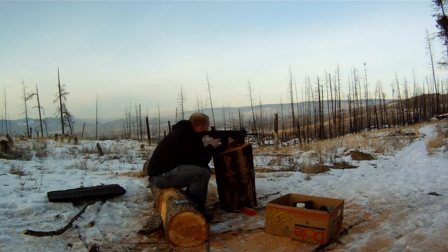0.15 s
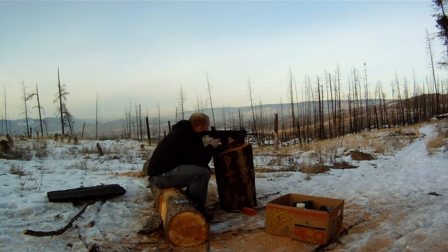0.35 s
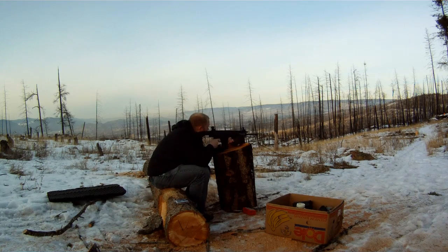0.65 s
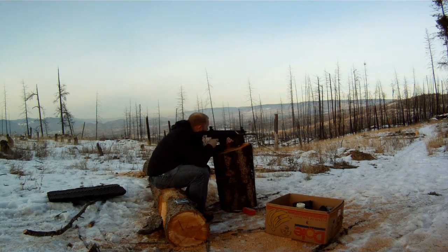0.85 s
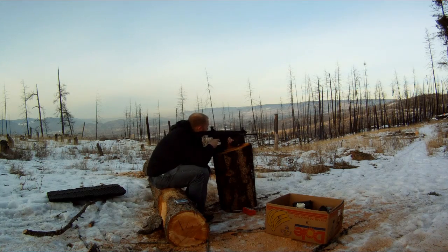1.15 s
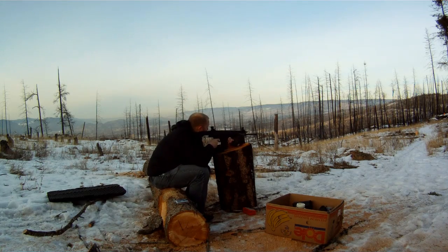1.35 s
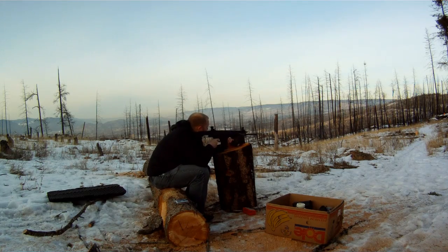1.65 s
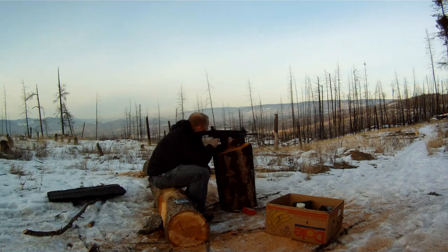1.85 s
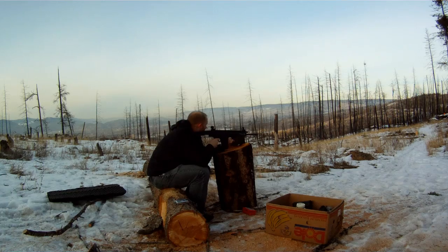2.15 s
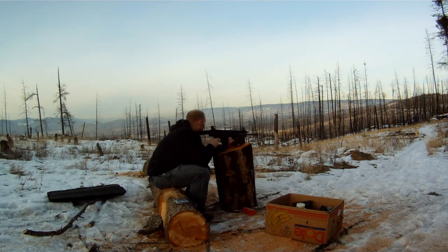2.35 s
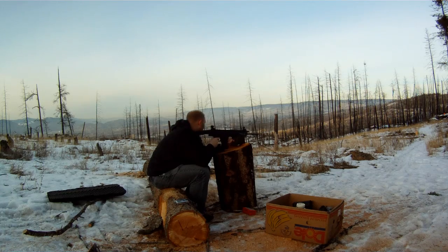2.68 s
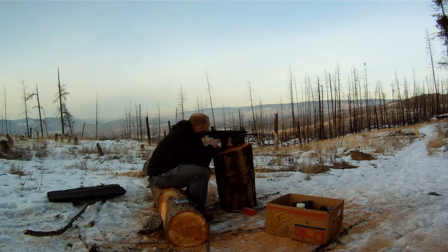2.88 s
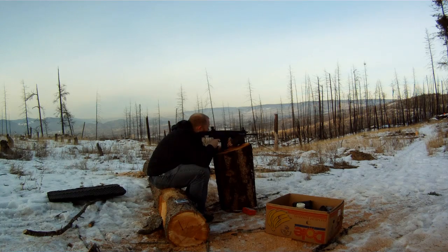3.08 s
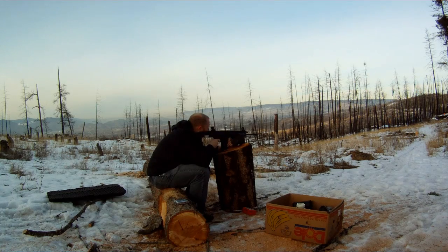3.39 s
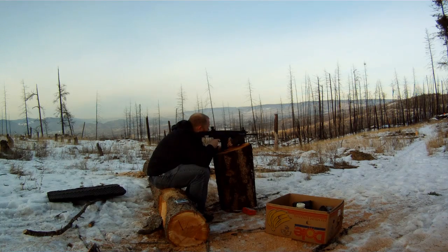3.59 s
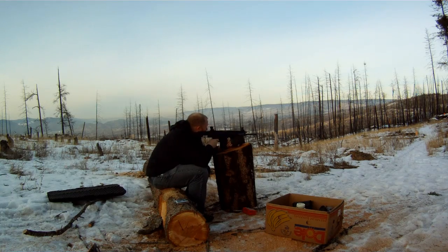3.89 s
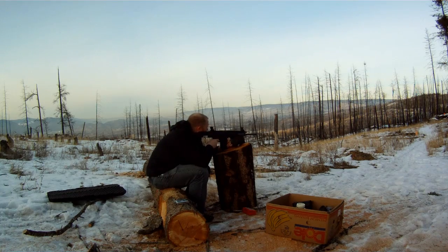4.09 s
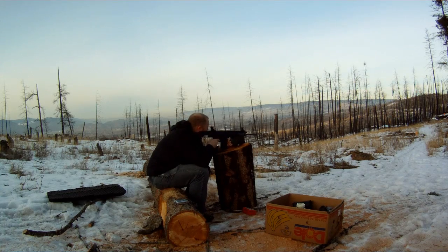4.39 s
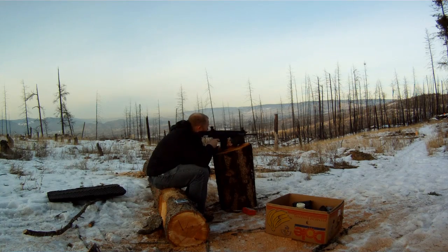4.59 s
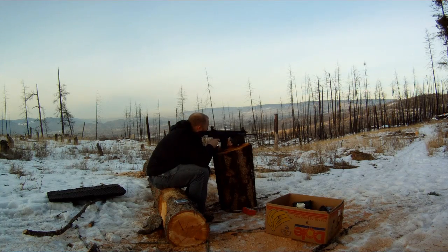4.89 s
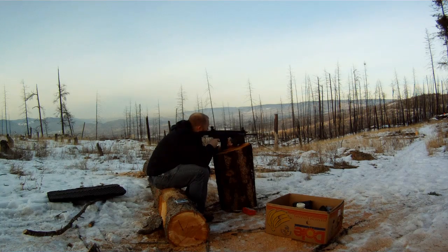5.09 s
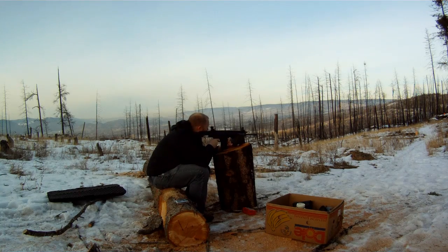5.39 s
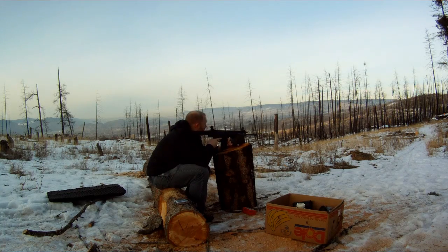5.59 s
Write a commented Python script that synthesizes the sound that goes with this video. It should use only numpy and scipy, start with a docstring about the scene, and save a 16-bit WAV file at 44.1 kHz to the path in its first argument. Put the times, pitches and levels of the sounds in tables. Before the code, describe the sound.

A wide, snowy hillside, heard through a nearby low-quality microphone with gritty treble. A low engine-like hum opens briefly stronger and slightly higher, then drops abruptly at 0.1 s to a fainter drone under soft air rumble and hiss. At about 0.95 s a rifle fires: a very short, harsh, clipped crack with a moment of suction and crackle. Echoes build immediately, slapping back from burnt trunks and slopes, strongest around 0.4 to 0.6 s after the shot, then rolling away ever duller, while a low rumble sinks in pitch. A small metal click sounds at 1.34 s. The tail fades into the hum, which shifts slightly higher at 2.8 s, with barely audible ticks. At 3.85 s a second, similar shot cracks, with the same long echo; a clearer metallic click follows at 4.35 s. The echo decays toward the quiet hum by the end, about 5.6 s.

```python
"""Two rifle shots on a snowy hillside: each is a burst of gas noise with a shock front, then suction,
that overloads a nearby microphone for a few milliseconds. The same long echo, filtered noise and slaps,
rolls back from burnt trunks and far slopes, ever duller, while a low wave sinks in pitch along the snow.
Damped modes give small metal clicks; harmonics and filtered noise make a distant engine hum over faint
air and hiss. Coarse sampling and holding adds a gritty mirror image in the treble."""
import sys
import numpy as np
from scipy import signal
from scipy.fft import rfft, irfft
from scipy.io import wavfile
from scipy.ndimage import uniform_filter1d

SR = 44100
rng = np.random.default_rng(int(sys.argv[2]) if len(sys.argv) > 2 else 0)


def generate_wav(sig):
    """Save sig (samples, or channels by samples) to the path in sys.argv[1] as 16-bit PCM at SR."""
    pcm = np.round(np.clip(np.atleast_2d(sig).T, -1, 1) * 32767).astype(np.int16)
    wavfile.write(sys.argv[1], SR, pcm)


N = 253134
ECHO_LENGTH = int(1.9 * SR)
TIME = np.arange(N) / SR
DELAY = TIME[:ECHO_LENGTH]   # seconds since a shot


def from_db(db):
    """Level to amplitude: 20 dB is a factor of ten."""
    return 10 ** (np.asarray(db) / 20)


def rms_one(x):
    """Normalization of power: scale to an rms of 1."""
    return x / np.sqrt(np.mean(x ** 2) + 1e-20)


def at_hz(points, hz):
    """Spectral interpolation: levels vary linearly along a log-frequency axis."""
    points = np.array(points)
    return np.interp(np.log(hz + 1), np.log(points[:, 0]), points[:, 1])


def butter(x, hz, kind, order=2):
    """Causal filtering with a maximally flat (Butterworth) passband."""
    sos = signal.butter(order, hz, kind, fs=SR, output="sos")
    return signal.sosfilt(sos, x + 1e-18)


def add(out, s, sound):
    """Superposition: mix a sound in, in place, at s seconds."""
    start = max(round(s * SR), 0)
    room = out[start:start + len(sound)]
    room += sound[:len(room)]


def drift(rate, size):
    """Slow random modulation: straight lines between unit-spread random knots, rate knots a second."""
    knots = rng.standard_normal(4096)
    return np.interp(np.arange(size) / SR * rate, np.arange(len(knots)), knots)


def causal(gain):
    """Minimum phase by folding the cepstrum: nothing sounds before its cause."""
    cepstrum = irfft(np.log(gain))
    half = len(cepstrum) // 2
    folded = np.r_[cepstrum[0], 2 * cepstrum[1:half], np.zeros(half)]
    return np.exp(rfft(folded))


# relative spectrum of still air and microphone hiss: pitch_hz [Hz], level_db [dB per Hz]
AIR_SPECTRUM = [(25, -4.5), (45, -1), (90, -2.5), (160, -10.5), (220, -17.5), (350, -19), (600, -21),
                (1000, -27), (2000, -30.5), (4500, -34), (5600, -37), (7000, -57)]


def air(level_db=-55):
    """Spectral shaping of white noise: a faint rumble under an even hiss."""
    hz = np.fft.rfftfreq(N, 1 / SR)
    white = rfft(rng.standard_normal(N))
    shaped = irfft(white * from_db(at_hz(AIR_SPECTRUM, hz)), N)
    return from_db(level_db) * rms_one(shaped)


# stretches of engine hum, joined abruptly: start_s [s], firing_rate_hz [Hz], first_harmonic_db [dB],
# second_harmonic_db [dB], exhaust_rasp_db [dB]; levels are before the random drift
ENGINE_STRETCHES = [(0, 69.5, -36, -54.5, -50.5), (.118, 64.35, -51.5, -64.5, -55),
                    (.95, 64.36, -57, -73, -58), (2.82, 72.6, -61.5, -57, -68.5),
                    (3.86, 75.4, -52, -62.5, -71)]


def engine(pipe_hz=385, pipe_width=0.45, waver=.005, throb=.6):
    """Periodic excitation of a resonance: two low harmonics, with firing pulses and gas in the exhaust."""
    starts, *columns = np.transpose(ENGINE_STRETCHES)
    row = np.maximum(np.searchsorted(starts, TIME, "right") - 1, 0)
    # a few milliseconds of smoothing softens each join
    hz, first_db, second_db, rasp_db = [uniform_filter1d(c[row], size=128) for c in columns]
    phase = 2 * np.pi * np.cumsum(hz * (1 + waver * drift(5, N))) / SR
    first = from_db(first_db) * np.sin(phase)
    second = from_db(second_db) * np.sin(2 * phase)
    hum = np.sqrt(2) * (first + second)

    # on the long way through the air each harmonic of the rasp fades and drifts on its own
    pulses = np.zeros(N)
    for k in range(3, 12):
        resonance = np.exp(-(np.log(k * hz / pipe_hz) / pipe_width) ** 2)
        fading = from_db(2.4 * drift(5, N))
        pulses += resonance * fading * np.cos(k * phase + 1.1 * drift(3.1, N))

    gas = butter(rng.standard_normal(N), [290, 560], "band")
    puffs = gas * (1 + throb * np.cos(phase))
    rasp = rms_one(rms_one(pulses) + .75 * rms_one(puffs))
    return hum * from_db(1.2 * drift(7.7, N)) + from_db(rasp_db) * rasp


# clicks of spent cases and of the rifle being handled: start_s [s],
# level_db [dB, of the contact noise before its filter and decay]
CLICKS = [(0.9400, -29), (1.3440, -22), (2.7650, -53), (2.7800, -58), (3.8504, -28), (4.3530, -14),
          (5.5700, -56)]
# modes of the metal: pitch_hz [Hz], relative level_db [dB], t60_s [s, time to decay by 60 dB]
METAL_MODES = [(2500, 0, .008), (3300, -4, .007), (4450, 0, .007), (5300, -1, .006)]


def metal_clicks():
    """Modal synthesis: a sharp snap of contact sets the damped modes of the metal ringing."""
    out, t = np.zeros(N), TIME[:SR // 20]
    modes = sum(from_db(db - 60 * t / t60) * np.sin(2 * np.pi * hz * t) for hz, db, t60 in METAL_MODES)
    modes = modes / np.linalg.norm(modes)
    snap = np.exp(-t / .003)
    for s, db in CLICKS:
        contact = butter(rng.standard_normal(len(t)), 2000, "high") * snap
        ring = signal.fftconvolve(contact, modes)[:len(t)]
        add(out, s, from_db(db) * (contact + .5 * ring))
    return out


def envelope(delay, rise, hold, fade_db_per_s):
    """Energy build-up and exponential decay: gain rises, holds and dies away after the delay."""
    since = DELAY - delay
    fade = from_db(-fade_db_per_s * np.maximum(since - rise - hold, 0))
    return np.clip(since / rise, 0, 1) * fade


# land that throws the shot back, in order the burnt wood nearby, the foot of the facing slope,
# its upper part, the ridge beyond: delay_s [s], level_db [dB], rise_s [s], hold_s [s], fade [dB per s]
SLOPES = [(0.03, -23.5, 0.28, 0.12, 38), (.39, -16.5, .025, 0.075, 84), (.525, -17, 0.03, 0.027, 34),
          (0.854, -28, .12, 0.14, 25.5)]


def land_gain():
    """Incoherent summation: reflections from the slopes add up in power at each delay."""
    gains = [from_db(db) * envelope(delay, rise, hold, fade) for delay, db, rise, hold, fade in SLOPES]
    return np.sqrt(sum(gain ** 2 for gain in gains))


def scatter(per_s=4000, spread_db=2.5, smooth=0.83, patchy_db=2.0, patches_per_s=70):
    """Diffuse scattering: patches of brush and far trees return a dense rain of weak reflections."""
    strength_db = spread_db * np.minimum(rng.exponential(1, ECHO_LENGTH), 3)
    sizes = from_db(strength_db) * rng.choice([-1, 1], ECHO_LENGTH)
    sparse = rms_one(sizes * (rng.random(ECHO_LENGTH) < per_s / SR))
    weak = sparse + smooth * rng.standard_normal(ECHO_LENGTH)
    patches = from_db(patchy_db * drift(patches_per_s, ECHO_LENGTH))
    return rms_one(weak * patches) * land_gain()


# big trunks and banks that stand out: delay_s [s], level_db [dB, before the boosts in reflectors]
BIG_REFLECTORS = [(0.06, -31.5), (0.092, -23.5), (0.15, -26), (0.205, -23), (0.231, -23), (0.262, -18),
                  (0.287, -24), (0.317, -16), (0.377, -15.5), (0.404, -10.5), (0.466, -13.5), (0.551, -14),
                  (0.606, -15.5), (0.628, -18.5), (1.016, -20.5), (1.063, -22.5), (1.108, -21)]
# lesser trunks: the quietest relative to the land around them; the loudest are two spreads above
TRUNKS_PER_S, TRUNK_DB, TRUNK_SPREAD_DB = 48, -1.1, 2


def reflectors(big_db=2.0, near_db=5.5, near_s=.25, count=120):
    """Discrete reflection: rows (delay s, gain) of big reflectors, boosted most when near, then trunks."""
    big = []
    for delay, db in BIG_REFLECTORS:
        boost_db = big_db + near_db * np.exp(-delay / near_s)
        big.append((delay, from_db(db + boost_db)))
    # lesser trunks stand at uneven distances
    delays = (np.arange(count) + rng.random(count)) / TRUNKS_PER_S
    trunk_db = TRUNK_DB + TRUNK_SPREAD_DB * rng.uniform(0, 2, count)
    gains = np.interp(delays, DELAY, land_gain()) * from_db(trunk_db)
    return big + list(zip(delays, gains))


def slaps(second_path=.5, second_path_s=.0017, twig_db=-2, twig_s=.003):
    """Multipath reflection: each reflector gives a dull slap, one more via the ground, and a twig splash."""
    out = np.zeros(ECHO_LENGTH)
    splash = np.exp(-TIME[:SR // 100] / twig_s)   # twigs answer within a few ms
    rows = reflectors()
    noises = rng.standard_normal((len(rows), len(splash)))
    for (delay, gain), twigs in zip(rows, noises):
        pulse = from_db(twig_db) * twigs * splash / np.linalg.norm(splash)
        pulse[0] = -1
        # the extra path by way of the ground differs a little between reflectors
        add(pulse, second_path_s * (1 + 0.194 * twigs[0]), [-second_path])
        add(out, delay, pulse / np.linalg.norm(pulse) * gain)
    # the level is that of a slap about 3 ms long, with little treble
    return butter(out, 2000, "low") * np.sqrt(.003 * SR)


# relative colour of an echo that has travelled for half a second: pitch_hz [Hz], level_db [dB]
ECHO_COLOUR = [(60, -19), (130, -18), (220, -16.5), (330, -10.5), (450, -4), (600, 0.5), (720, -1),
               (860, -7), (1120, -8), (1450, -14.5), (2000, -16), (3000, -23), (4200, -28.5), (5500, -34.5)]
# extra loss on longer paths, growing with the root of the delay: pitch_hz [Hz], loss [dB per root s]
TRAVEL_LOSS = [(60, 15.5), (200, 7.5), (350, 0.5), (600, -0.5), (850, 11), (1150, 6), (2000, 21),
               (3200, 36.5), (5500, 54)]


def hillside(size=16384):
    """Absorption along the path: later reflections lose more treble to the air and bass to the snow."""
    clicks = scatter() + slaps()
    out, hz = np.zeros(ECHO_LENGTH), np.fft.rfftfreq(size, 1 / SR)
    step = SR // 10
    top_cut = 1 / np.sqrt(1 + (hz / 5700) ** 30)
    # overlapping triangular windows cross-fade from one colour to the next
    for centre in range(0, ECHO_LENGTH + step, step):
        start = max(centre - step, 0)
        part = clicks[start:centre + step]
        part = part * (1 - np.abs(start + np.arange(len(part)) - centre) / step)
        further = np.sqrt(centre / SR + .05) - np.sqrt(.55)   # zero at half a second
        colour_db = at_hz(ECHO_COLOUR, hz) - further * at_hz(TRAVEL_LOSS, hz)
        gain = from_db(colour_db) * top_cut
        add(out, start / SR, irfft(rfft(part, size) * causal(rms_one(gain))))
    return out


# the wave that clings to the snow sinks in pitch, its lowest part arriving last
GROUND_START_HZ, GROUND_END_HZ, GROUND_SINK_S = 137.5, 66, .28
GROUND_DB, GROUND_RISE_S, GROUND_HOLD_S, GROUND_FADE_DB_PER_S = -34.5, .13, .33, 43.5


def ground_wave(width_hz=110, evenness=.3):
    """Dispersion of a surface wave: narrow-band rumble sinks in pitch, its swells partly evened out."""
    sink = 1 / (1 + (DELAY / GROUND_SINK_S) ** 3)
    hz = GROUND_END_HZ + (GROUND_START_HZ - GROUND_END_HZ) * sink
    swell = drift(width_hz, ECHO_LENGTH) + 1j * drift(width_hz, ECHO_LENGTH)
    swell /= np.abs(swell) ** evenness
    carrier = np.exp(2j * np.pi * np.cumsum(hz) / SR)
    rumble = rms_one(np.real(swell * carrier))
    return rumble * from_db(GROUND_DB) * envelope(0, GROUND_RISE_S, GROUND_HOLD_S, GROUND_FADE_DB_PER_S)


def blast(jet_db, jet_s, jet_hz, front_s, push=2.7, arrival=.45, suction=2.13, suction_end_s=.0101,
          refill_s=.0016, crackle_db=-19, crackle_s=0.0015, hiss_db=-45):
    """Overpressure and rarefaction: a ragged burst, then suction pins the microphone until air flows back."""
    t = TIME[:SR // 10]
    noise = butter(rng.standard_normal(len(t)), jet_hz, "low", order=3)
    gas = rms_one(butter(noise, 1800, "high", order=1))
    jet = from_db(jet_db) * gas * np.interp(t / jet_s, [0, .1, 1, 1.06], [0.075, 0.87, 0.9, 0.0033])

    # the N-shaped shock front passes midway through the jet
    passed = (t - arrival * jet_s) / front_s
    shock = push * (1 - 2 * passed) * (passed > 0) * (passed < 1)
    front = shock - np.interp(t / jet_s, [1, 1.1], [0, suction])
    refill = np.interp((t - suction_end_s) / refill_s, [0, .06, .7, 1], [1, 0.45 / suction, .5 / suction, 0])

    # the ground close by scatters the blast as a short crackle and a fading hiss
    since = np.maximum(t - suction_end_s, 0)
    crackle = from_db(crackle_db) * np.exp(-since / crackle_s)
    hiss = from_db(hiss_db) * np.exp(-since / 0.026)
    return jet + front * refill + gas * (since > 0) * (crackle + hiss)


# shots: start_s [s], echo_db [dB, gain of the land's answer], jet_db [dB, gas jet before its envelope],
# jet_length_s [s], jet_brightness_hz [Hz, low-pass corner], shock_front_s [s]
SHOTS = [(0.9451, -1.5, -2, 0.0044, 4130, .0018), (3.8549, -1.5, 3, .0058, 3900, .0016)]
FIRST_ECHO_END_S = 2.82


def rifle():
    """Linear response from one spot: the land answers both shots alike; the first answer stops short."""
    out = np.zeros(N)
    answer = hillside() + ground_wave()
    echo_ends = [FIRST_ECHO_END_S, N / SR]
    for (s, echo_db, jet_db, jet_s, jet_hz, front_s), end in zip(SHOTS, echo_ends):
        add(out, s, blast(jet_db, jet_s, jet_hz, front_s))
        add(out, s, from_db(echo_db) * answer * (s + DELAY < end))
    return out


def scene():
    """Superposition of all the pressures that reach the microphone."""
    return (air() + engine() + metal_clicks() + rifle())[None]


SAMPLING_HZ, CUTOFF_HZ = 12000, 15400


def record(dry, coupling_hz=50, headroom=0.98):
    """Saturation, then imaging: the preamplifier clips and sags; held samples mirror the spectrum upward."""
    saturated = np.clip(dry, -headroom, headroom)
    sagging = butter(saturated, coupling_hz, "high", order=1)
    coarse = np.clip(signal.resample_poly(sagging, SAMPLING_HZ, SR, axis=-1), -1, 1)
    # each coarse sample is held as eight equal fine ones
    steps = np.repeat(coarse, 8, axis=-1)
    held = signal.resample_poly(steps, SR, 8 * SAMPLING_HZ, axis=-1)[:, :N]
    return signal.sosfilt(signal.ellip(10, .1, 70, CUTOFF_HZ, fs=SR, output="sos"), held)


dry = scene()
out = record(dry)
generate_wav(out)
```